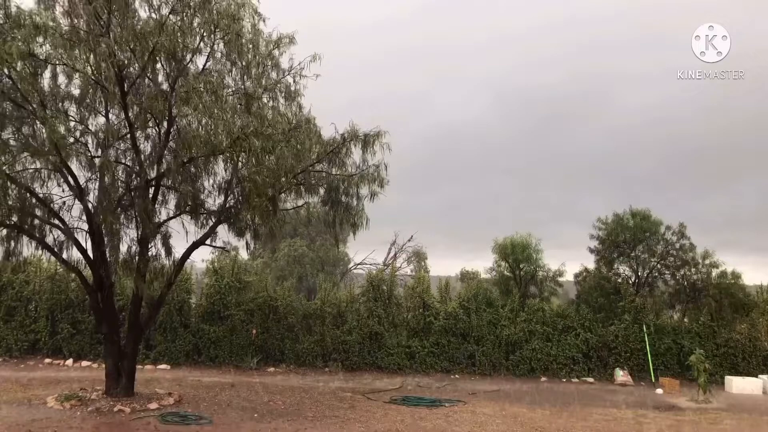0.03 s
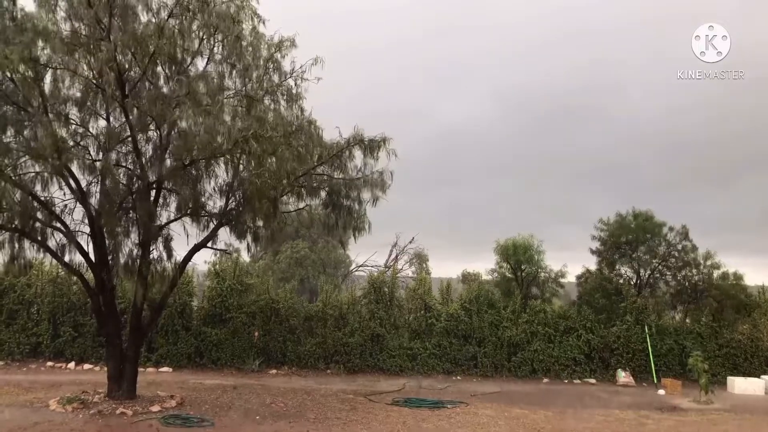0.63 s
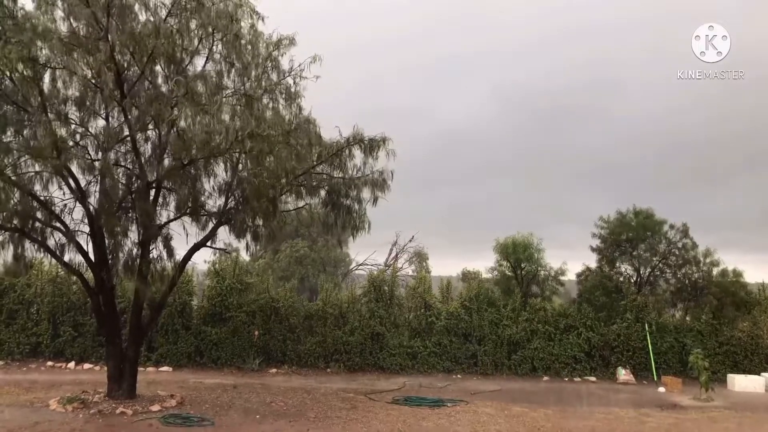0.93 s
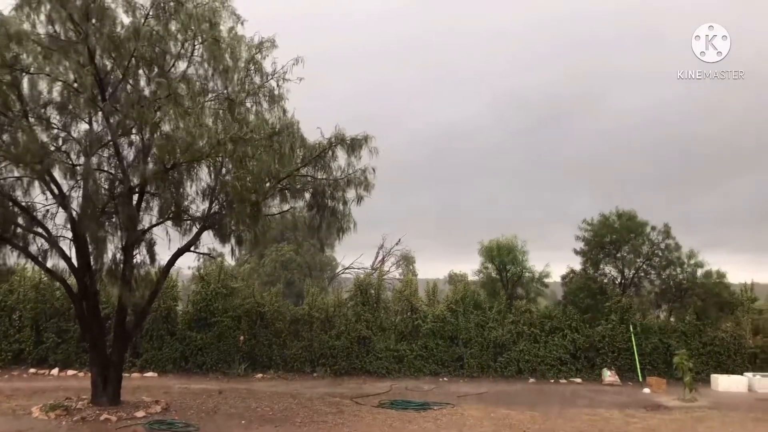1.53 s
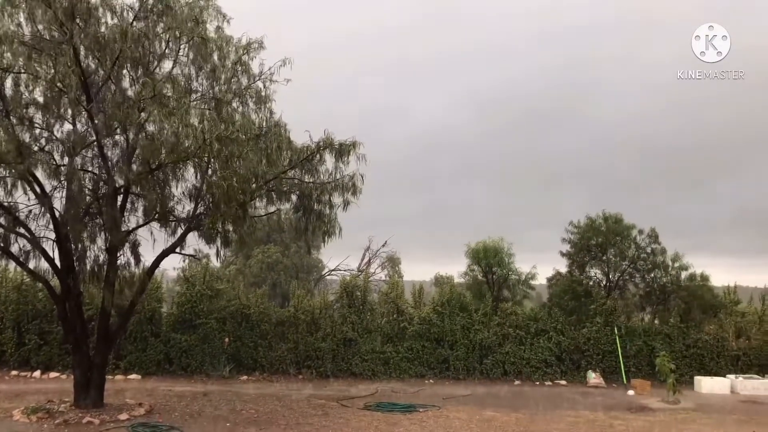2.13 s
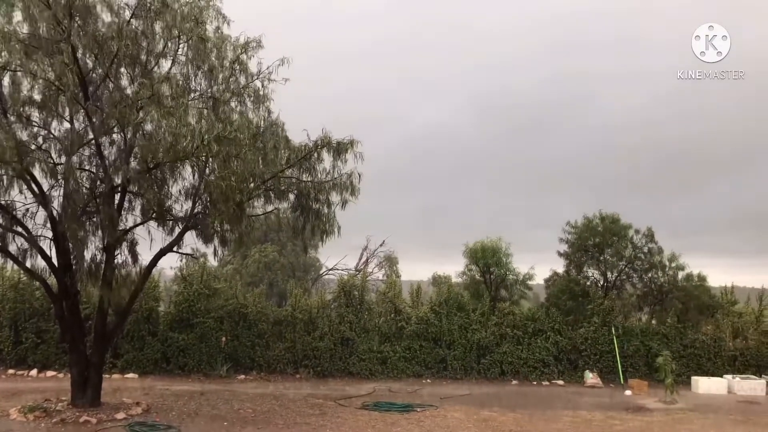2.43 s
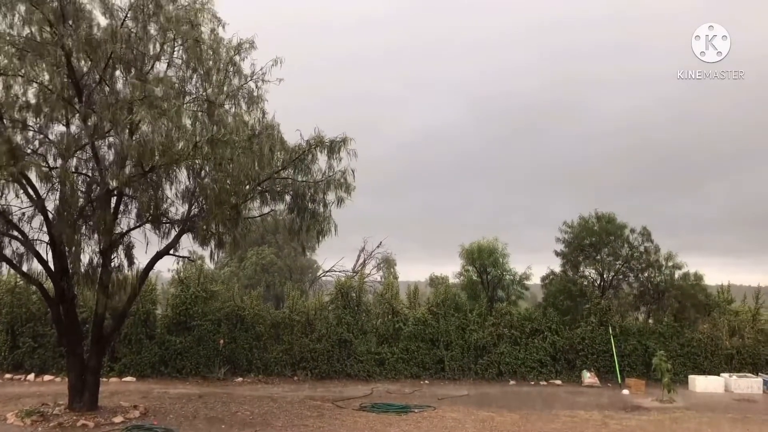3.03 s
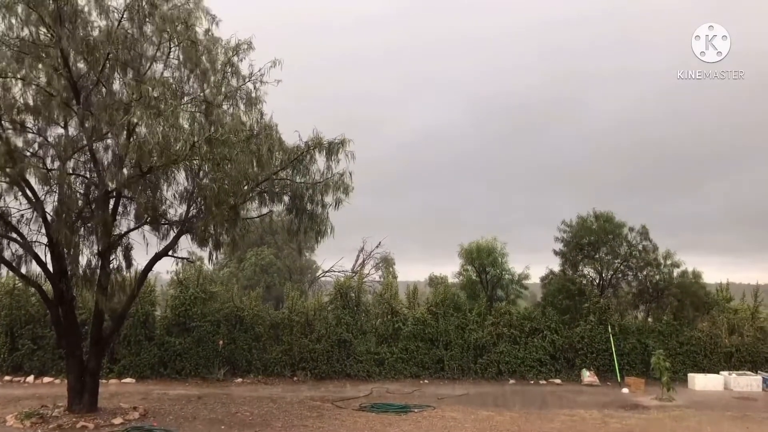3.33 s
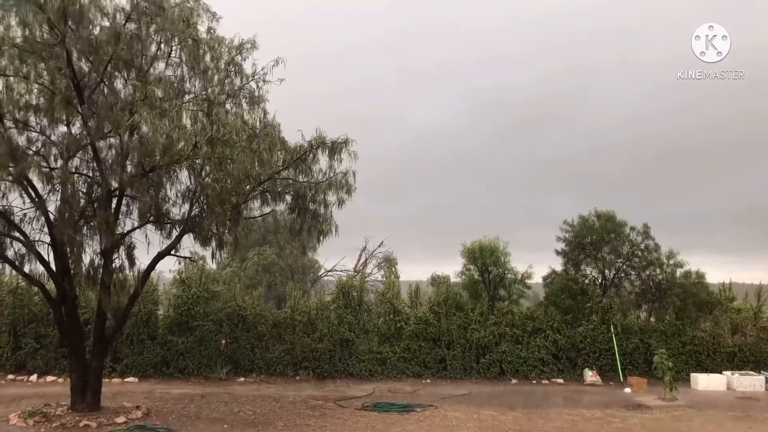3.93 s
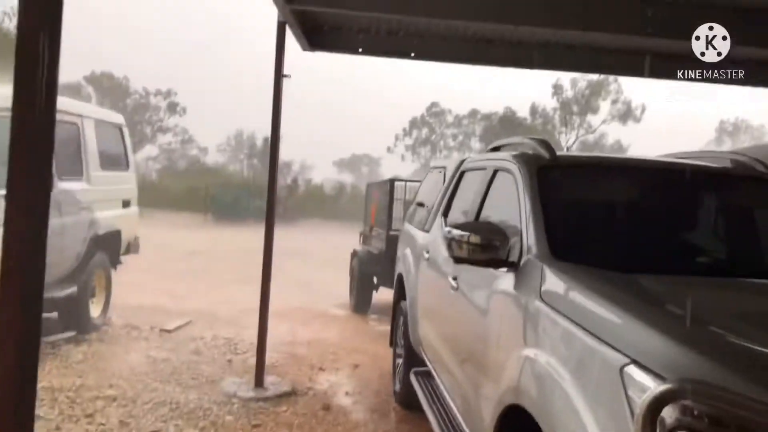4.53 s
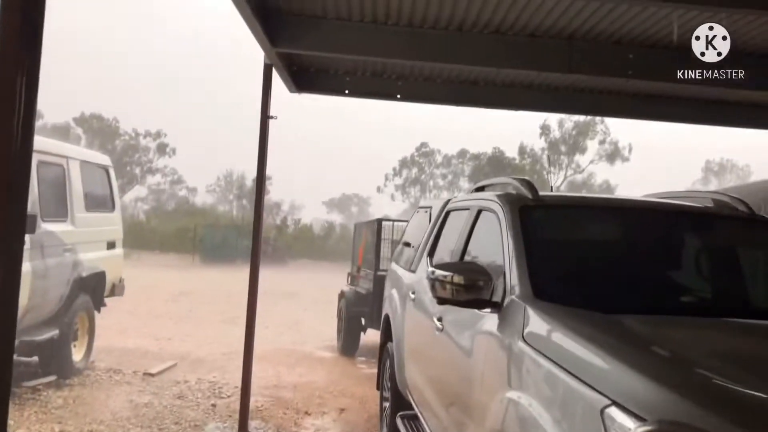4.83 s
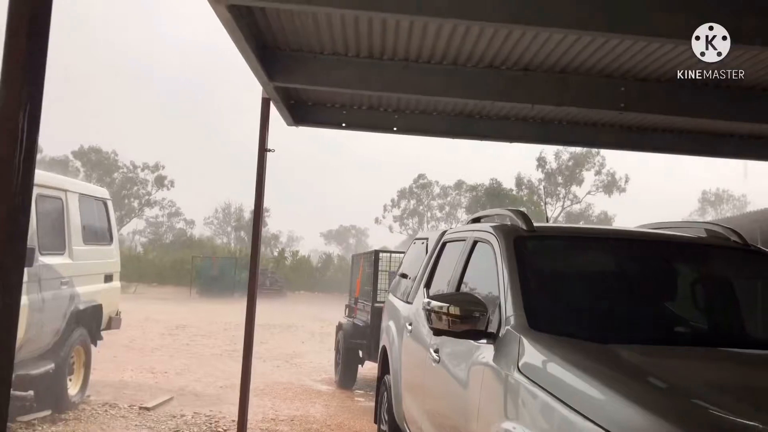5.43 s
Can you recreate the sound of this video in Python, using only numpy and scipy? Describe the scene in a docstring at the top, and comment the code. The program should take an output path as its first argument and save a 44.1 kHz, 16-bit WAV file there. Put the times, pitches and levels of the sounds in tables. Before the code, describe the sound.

Heard from under a metal roof beside an open yard, rain patters evenly, single drops standing out and small drips ticking on the ground nearby. About four seconds in, the rain stops abruptly for an instant. Then a heavier, clearly louder downpour takes over, its drops merging into a roar on the faintly ringing sheets of a carport, with a strong splashing hiss. The sound is centred throughout.

```python
"""Steady rain drums on a corrugated metal roof overhead, and a few drips smack the ground close by. After about
four seconds the sound cuts out for a moment and the scene changes: a louder downpour on a carport swells in.
Thousands of drops make the metal sheets ring, and their splashes add a fine hiss of spray. Both ears hear the
same sound."""
import sys
import numpy as np
from scipy import signal
from scipy.fft import rfft, irfft
from scipy.io import wavfile
from scipy.ndimage import uniform_filter1d

SR = 44100
rng = np.random.default_rng(int(sys.argv[2]) if len(sys.argv) > 2 else 0)


def to_wav(s):
    """Save 16-bit WAV."""
    ch = np.atleast_2d(s).T  # columns
    pcm = np.round(np.clip(ch, -1, 1) * 32767)  # PCM
    wavfile.write(sys.argv[1], SR, pcm.astype(np.int16))


N = 246519
TIME = np.arange(N) / SR
FREQ = np.fft.rfftfreq(N, 1 / SR)
STEADY_END_S, DOWNPOUR_START_S = 4.026, 4.096


# The tone of the roof in steady rain. Each row: frequency in Hz, relative level in dB.
STEADY_ROOF_TONE = [(25, -37), (45, -14), (70, -7), (110, -6.5), (155, -3), (240, -1), (460, -3.5),
                    (600, -1.8), (1200, -0.7), (1950, -1), (2400, -7.5), (3600, -14), (6000, -29),
                    (16000, -44)]
# The notes this roof rings at. Each row: pitch in Hz, width in Hz, boost in dB.
STEADY_ROOF_NOTES = [(155.5, 29, 4.5), (890, 55, 0.6), (1700, 120, 2)]
# The tone of the splashes. Each row: frequency in Hz, relative level in dB.
STEADY_SPRAY_TONE = [(500, -33), (2000, -4.5), (4200, -5), (6400, -3.5), (9200, -8), (12500, -8.5),
                     (16000, -10)]
# The rain eases, builds and eases again. Each row: time in seconds, level change in dB.
STEADY_STRENGTH = [(0, 0.5), (.7, -.5), (2.4, 0.65), (4.0, -0.75)]

def steady_rain():
    """Single drops still stand out from the drumming on the roof; the sound cuts off abruptly where the scene
    changes."""
    hits = roof_sheets(per_s=4800, spread_db=4.5, ring_s=0.062, ring_db=2)
    drumming = colour(hits, STEADY_ROOF_TONE, STEADY_ROOF_NOTES)
    hiss = colour(spray(per_s=1500, spread_db=4.5, wash_db=7), STEADY_SPRAY_TONE)
    strength_db = np.interp(TIME, *np.transpose(STEADY_STRENGTH)) + gusts()
    rain = rainfall(undb(-21.5) * drumming, undb(-26.5) * hiss, strength_db)
    return rain * (TIME < STEADY_END_S)


# The tone of the carport roof. Each row: frequency in Hz, relative level in dB.
DOWNPOUR_ROOF_TONE = [(25, -33), (45, -22), (65, -8.5), (115, -13), (140, -3), (195, -8), (260, -1),
                      (450, -4), (600, -0.5), (1800, -1.5), (2300, -6.5), (4000, -12.5), (6000, -21.5),
                      (16000, -37)]
# The notes this roof rings at. Each row: pitch in Hz, width in Hz, boost in dB.
DOWNPOUR_ROOF_NOTES = [(148, 31, 3), (360, 20, 0.62), (1030, 74, 3.4), (1780, 180, 1)]
# The tone of the heavy splashing. Each row: frequency in Hz, relative level in dB.
DOWNPOUR_SPRAY_TONE = [(500, -23), (2000, 1.5), (4000, 0), (5000, -1.5), (6500, -0.5), (10000, -3),
                       (16000, -7)]

def downpour(swell_s=0.14):
    """So many drops that they merge into a roar; it swells in quickly and holds, surging slightly."""
    hits = roof_sheets(per_s=11000, spread_db=6, ring_s=0.061, ring_db=5)
    drumming = colour(hits, DOWNPOUR_ROOF_TONE, DOWNPOUR_ROOF_NOTES)
    hiss = colour(spray(per_s=4500, spread_db=4.5, wash_db=5.5), DOWNPOUR_SPRAY_TONE)
    rain = rainfall(undb(-12.5) * drumming, undb(-17.5) * hiss, gusts())
    swell = np.interp(TIME, [DOWNPOUR_START_S, DOWNPOUR_START_S + swell_s], [undb(-24.5), 1], left=0)
    return rain * swell


def roof_sheets(per_s, spread_db, ring_s, ring_db, patches=28):
    """Each patch of roof rings in its own way when hit, quickly hushed by the film of water on it."""
    return sum(ring(drops(per_s / patches, spread_db, largest=2.6), hit_with_tail(ring_s, ring_db))
               for _ in range(patches))


def drops(per_s, spread_db, largest):
    """Drops land at random. Few are large, and past a certain size a drop breaks apart."""
    lands = rng.random(N) < per_s / SR
    size = undb(spread_db * np.minimum(rng.standard_normal(N), largest))
    return lands * size * rng.choice([-1, 1], N)


def spray(per_s, spread_db, wash_db, spots=8):
    """Nearby splashes tick and splatter over the smooth wash of rain far across the yard."""
    near = sum(ring(drops(per_s / spots, spread_db, largest=2.3), hit_with_tail(0.002, tail_db=-5.5))
               for _ in range(spots))
    far = undb(wash_db) * rng.standard_normal(N)
    return unit(near) + far


# The loudest nearby drips. Each row: start in seconds, level in dB, pitch in Hz.
LOUD_DRIPS = [(0.165, -9.5, 9850), (0.4588, -5.5, 7400), (1.313, -2.5, 11500), (2.0605, -6.5, 7900),
              (2.3089, -9.5, 11100), (3.3434, -8.5, 8600), (3.8544, -9.5, 9100)]

def drips():
    """In the steady rain, each drip hits the ground with a tiny smack and a short splatter."""
    out = np.zeros(N)
    t = np.arange(256) / SR
    for start_s, level_db, pitch_hz in list(LOUD_DRIPS) + faint_drips():
        cycles = pitch_hz * t
        smack = cycles * np.exp(-2 * cycles) * np.sin(2 * np.pi * cycles)  # lasts a wave or two
        splatter = hit_with_tail(fade_s=0.1, tail_db=-2)
        drip = signal.fftconvolve(smack / np.abs(smack).max(), splatter)
        start = int(start_s * SR)
        out[start:start + len(drip)] += undb(level_db) * drip
    return out * (TIME < STEADY_END_S)


def faint_drips(per_s=3, level_db=-11, pitch_hz=8200):
    """More rows for drips(): quieter ones, at random times and scattered pitches."""
    return [(rng.uniform(0, STEADY_END_S), level_db, pitch_hz * 2 ** rng.uniform(-0.88, 0.8))
            for _ in range(int(per_s * STEADY_END_S))]


def gusts(per_s=6, depth_db=0.15):
    """Small random surges in the rainfall, as a level change in dB."""
    hold = int(SR / per_s)
    steps = rng.standard_normal(N)[np.arange(N) // hold]
    return depth_db * uniform_filter1d(steps, hold)


def rainfall(drumming, hiss, strength_db, hiss_share=0.66):
    """Stronger rain is louder; the hiss rises and falls less than the drumming does."""
    return undb(strength_db) * drumming + undb(hiss_share * strength_db) * hiss


def hit_with_tail(fade_s, tail_db, samples=8192):
    """One sharp hit, then a blur of tiny echoes that fades by 60 dB in fade_s seconds."""
    t = np.arange(samples) / SR
    tail = rng.standard_normal(samples) * np.exp(-np.log(1000) * t / fade_s)
    return (t == 0) + undb(tail_db) * tail / np.linalg.norm(tail)


def ring(patter, hit_sound):
    """Give every drop in a patter the same sound; tails past the end wrap round to the start."""
    return irfft(rfft(patter) * rfft(hit_sound, N), N)


def colour(sound, tone, notes=()):
    """Shape a sound with a tone curve and ringing notes, then set its average level to 1."""
    hz, db = np.transpose(tone)
    shape_db = np.interp(np.log(FREQ + 1), np.log(hz), db)
    for pitch_hz, width_hz, boost_db in notes:
        shape_db += boost_db / (1 + (2 * (FREQ - pitch_hz) / width_hz) ** 2)
    # Put all the ringing after each hit, so that the hit keeps its sharp start.
    cepstrum = irfft(np.log(undb(shape_db)), N)
    cepstrum[1:N // 2] *= 2
    cepstrum[N // 2:] = 0
    tone_filter = np.exp(rfft(cepstrum))
    return unit(irfft(rfft(sound) * tone_filter, N))


def undb(db):
    """Turn decibels into a number to multiply by."""
    return 10 ** (np.asarray(db) / 20)


def unit(sound):
    """Set the average level (rms) to 1."""
    return sound / np.sqrt(np.mean(sound ** 2))


def scene():
    """Both showers and the drips, alike left and right."""
    return np.tile(steady_rain() + downpour() + drips(), (2, 1))


def record(dry, ceiling=0.95, top_hz=15800):
    """Round off the loudest peaks and cut the very highest treble."""
    rounded = dry / (1 + (dry / ceiling) ** 8) ** (1 / 8)
    treble_cut = signal.ellip(12, 0.1, 80, top_hz, fs=SR, output="sos")
    return signal.sosfilt(treble_cut, rounded)


dry = scene()
out = record(dry)
to_wav(out)
```